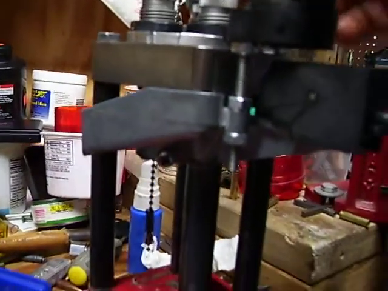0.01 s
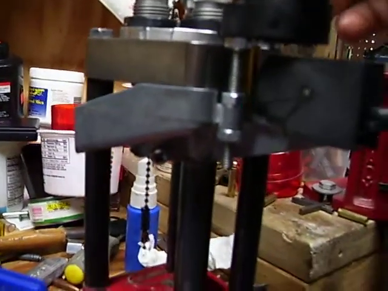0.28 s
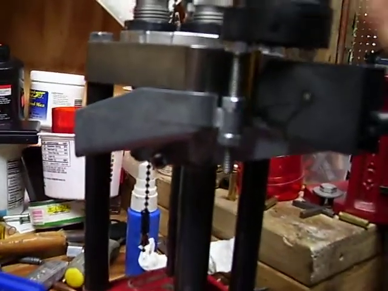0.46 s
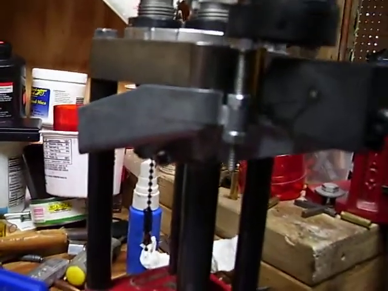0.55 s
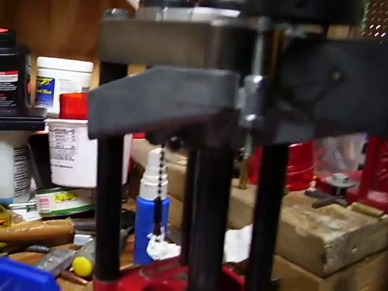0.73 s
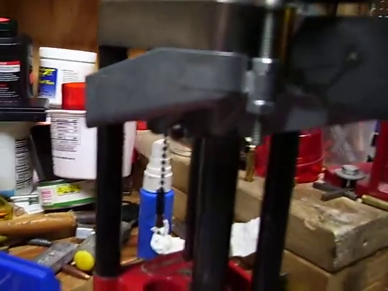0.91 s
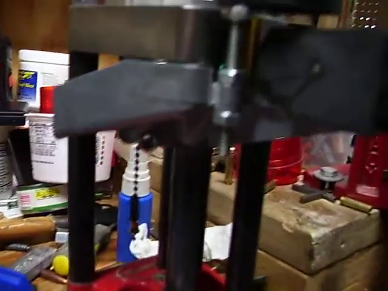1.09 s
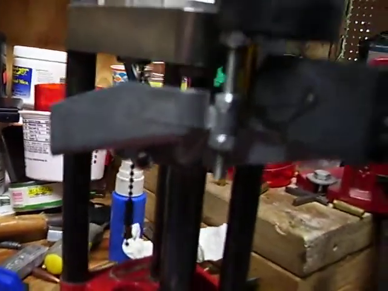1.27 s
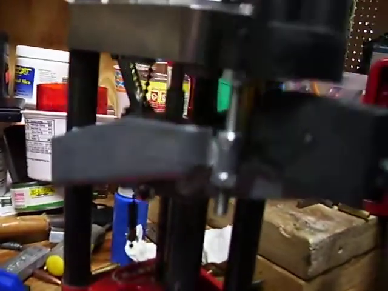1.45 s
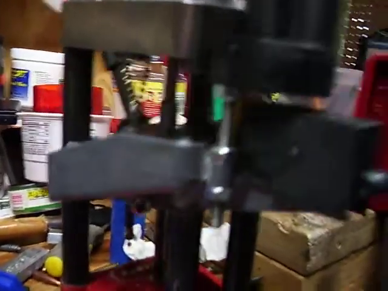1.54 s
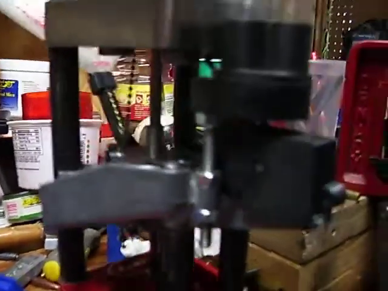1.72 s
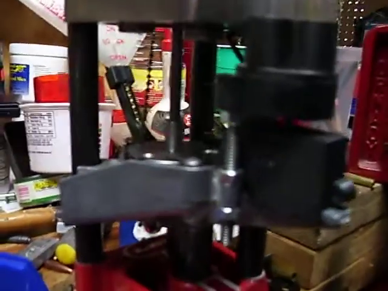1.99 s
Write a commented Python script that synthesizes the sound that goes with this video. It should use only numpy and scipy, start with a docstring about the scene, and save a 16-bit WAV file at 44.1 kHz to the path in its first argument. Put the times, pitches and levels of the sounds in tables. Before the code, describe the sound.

Close by in a small workshop, a metal lever press is worked by hand: small parts rattle and snap, the linkage knocks with a faint groan, and the sliding ram scrapes and clunks twice, the second time harder.

```python
"""A small workshop, close to a hand-worked metal reloading press on a wooden bench.
Small parts rattle and snap against the plate, the linkage knocks and groans as the lever takes up
its slack, then the ram slides down with a scraping rattle and two clunks of the frame. Impacts and
stick-slip friction excite each part's dense response and its distinct, damped modes.
The microphone passes little above 4 kHz and overloads on the hardest blows."""
import sys
import numpy as np
from scipy import signal
from scipy.fft import rfft, irfft
from scipy.io import wavfile
from scipy.ndimage import uniform_filter1d

SR = 44100
rng = np.random.default_rng(int(sys.argv[2]) if len(sys.argv) > 2 else 0)


def bounce(signal):
    """Save signal as a 16-bit WAV file at the path given by the first command-line argument."""
    frames = np.transpose(np.atleast_2d(signal))
    limited = np.clip(frames, -1, 1)
    pcm = np.round(limited * 32767).astype(np.int16)
    wavfile.write(sys.argv[1], SR, pcm)


N = 88200

# Friction envelopes of the ram: time_s, body_db, treble_db, bass_db
RAM_LEVELS = [(0, -44, -59.5, -59), (0.139, -48, -54, -61), (.5, -68, -66.5, -76), (.88, -65.5, -76, -63.5),
              (.93, -52, -75.5, -44.5), (1.02, -57.5, -68, -59), (1.17, -69, -59, -59.5),
              (1.23, -57, -57.5, -46), (1.275, -54, -48, -57), (1.298, -36, -39.5, -62.5),
              (1.352, -35, -45.5, -52), (1.40, -27.5, -23.5, -41.5), (1.47, -30, -24.5, -40.5),
              (1.54, -30.5, -34, -44), (1.589, -27.5, -33, -45), (1.634, -31.5, -40.5, -44.5),
              (1.675, -26, -32.5, -54), (1.72, -33, -42.5, -43), (1.76, -26.5, -24.5, -46),
              (1.82, -40.5, -27, -46), (1.85, -34.5, -33.5, -42.5), (1.89, -28.5, -36, -36),
              (1.928, -40.5, -46, -51), (1.959, -38.5, -37, -60), (2.0, -57, -52, -57)]
# Blows on the plate and snaps of the sprung catch: start_s, level_db
PLATE_BLOWS = [(.002, -37.5), (.106, -26.5), (.123, -26.5), (0.139, -28.5), (0.197, -32), (0.2179, -7.5),
               (.232, -19), (0.2818, -44), (.294, -37)]
CATCH_SNAPS = [(0.2119, -6.5), (0.2144, -7), (0.2164, -11), (0.2201, -12), (0.2238, -10), (0.2272, -18),
               (0.2483, -17.5), (0.262, -23.5), (0.2714, -27), (0.2768, -22.5), (0.2814, -30),
               (.319, -30.5), (0.3808, -34.5)]
# Impacts of small steel parts and of the frame: start_s, level_db, tilt_db_per_octave
STEEL_CLICKS = [(0.1002, -26.5, -4), (.119, -24.5, -5), (0.13, -23, -4), (.179, -47, 0.5),
                (1.071, -31.5, -6), (1.092, -26.5, -8), (1.3586, -23.5, -0.5), (1.3692, -22.5, -3.5),
                (1.380, -22, -0.5), (1.3855, -15, -0.5), (1.390, -14, -3), (1.3979, -16, 3),
                (1.4182, -21, -0.5), (1.4312, -22.5, 6.5), (1.4412, -13.5, 5.5), (1.4609, -22.5, 1.5),
                (1.481, -25.5, -0.5), (1.7278, -35.5, 0.5), (1.7423, -25, -3.5), (1.7458, -19, 5),
                (1.7675, -19, 8), (1.7768, -22, 8), (1.787, -18.5, 4), (1.7925, -24, 2), (1.876, -28, 9),
                (1.955, -38.5, -1.5)]
FRAME_CLUNKS = [(1.364, -22, 0), (1.3845, -14.5, -1.5), (1.3885, -13, -2), (1.746, -7, 5.5),
                (1.7516, -5, 2), (1.757, -16, 1.5), (1.881, -30.5, -11)]
# Taps of a loose part: start_s, level_db, pitch_hz
LOOSE_TAPS = [(0.414, -33, 1441), (0.4385, -32.5, 1148), (0.459, -34.5, 1407), (0.472, -35.5, 1230),
              (0.485, -43, 1280)]
# Groans of the slipping linkage: start_s, length_s, pitch_hz, level_db
LINKAGE_GROANS = [(0.904, 0.059, 552, -36), (1.2, 0.079, 104, -44), (1.26, 0.14, 343.6, -32.5)]
# Knocks of the linkage and their thuds in the base: start_s, level_db, tilt_db_per_octave, thud_db
LINKAGE_KNOCKS = [(0.9226, -33, -3, -40.5), (1.0752, -22.5, -3, -29.5), (1.0969, -19.5, 0, -27),
                  (1.194, -24.5, 6.5, -48.5), (1.2015, -23.5, 3.5, -43.5)]

# Dense responses of the struck parts: frequency_hz, gain_db
PLATE_RESPONSE = [(40, -35.5), (200, -26.5), (480, -18.5), (690, 1), (860, -13.5), (1130, 5), (1350, -11),
                  (1650, -11), (3000, -13.5), (4500, -38.5)]
STEEL_RESPONSE = [(40, -33.5), (200, -18.5), (500, -21.5), (1000, -3.5), (1900, -0.5), (2150, -1.5),
                  (2600, 3.5), (3200, -1.5), (3600, -2), (4300, -7)]
CATCH_RESPONSE = [(100, -29.5), (600, -23.5), (1200, -17), (1900, -7), (2350, -7), (2700, 3), (3100, -1.5),
                  (3400, -3), (3620, 0.5), (3900, -9.5), (4400, -10)]
LOOSE_RESPONSE = [(100, -15.5), (900, -17.5), (1130, 8), (1520, 2.5), (1700, -17.5), (3000, -7.5),
                  (4000, -35.5)]
LINKAGE_RESPONSE = [(40, -35.5), (110, -19.5), (220, -14), (320, -7), (450, -2.5), (680, 4), (1000, -12),
                    (1450, -9), (1850, -23), (4500, -39.5)]
FRAME_RESPONSE = [(40, -27.5), (110, -20), (195, -9), (300, -10.5), (460, -8.5), (630, 2), (740, -0.5),
                  (850, -3.5), (1000, -5.5), (1130, -9.5), (1330, -2), (1600, -21), (4500, -33.5)]
# Dense responses of the parts driven by the ram: frequency_hz, gain_db
FRAME_RUB_RESPONSE = [(60, -28), (200, -14.5), (330, 2), (500, -2.5), (640, 0.5), (800, -1.5), (1000, 1.5),
                      (1350, -5.5), (1700, -11), (2200, -14.5), (4000, -25.5)]
STEEL_RUB_RESPONSE = [(200, -34.5), (1300, -17), (1850, 6.5), (2130, -7.5), (2400, 10.5), (2800, 3),
                      (3150, 5), (3500, 5), (5000, -11)]
BENCH_RESPONSE = [(25, -30.5), (75, -24.5), (112, 8), (155, 0.5), (190, 0), (250, 3), (600, -29.5),
                  (2000, -72)]
# Distinct modes of each part: frequency_hz, level_db, t60_s
PLATE_RESONANCES = [(621, -19, 0.17), (700, -8.5, 0.2), (942, -15, 0.3), (1036, -19.5, 0.37),
                    (1126, -12, 0.084), (1226, -5, 0.26), (1385, 2.5, 0.15), (1472, -16, 0.12)]
STEEL_RESONANCES = [(2308, -0.78, 0.2), (2353, -1.2, 0.44), (2525, -2, 0.12), (2776, 1, .16),
                    (2930, -1, 0.23), (3280, 0.91, 0.1), (3360, -0.9, 0.16), (3394, -2.8, 0.16),
                    (3670, 0, 0.095)]
LINKAGE_RESONANCES = [(548, -5, 0.067), (703.5, 5, 0.084)]
BASE_RESONANCES = [(276, -9.5, .06), (345, 0, 0.11), (446, -10.5, .07)]
FRAME_RESONANCES = [(187.9, -15, 0.25), (438.4, -21.5, 0.3), (627, -9, 0.14), (692.3, -16, 0.27),
                    (835, -13, 0.059), (990, -15, .11), (1216, -16.5, 0.29), (1323, -10, 0.11)]
BENCH_RESONANCES = [(106, -12, 0.19), (191.8, -2.5, 0.4), (345, -0.5, 0.39)]

# Spectrum of the steady room noise: frequency_hz, relative_db
ROOM_NOISE = [(25, 15), (60, 4.5), (110, -8.5), (200, -5), (250, -0.5), (480, 1.5), (800, 0.5), (1300, -3),
              (2100, -7), (3400, -12.5), (4300, -12.5)]
# Reverberation time of the workshop: frequency_hz, t60_s
REVERB_TIMES = [(100, 0.66), (500, 0.16), (1300, 0.28), (3500, 0.18)]
# Responses of the reverberation and the microphone: frequency_hz, gain_db
REVERB_RESPONSE = [(200, -9), (1200, -9.5), (3000, -18)]
MIC_RESPONSE = [(20, -19.5), (60, -10), (100, -3.5), (3550, -2.5), (3800, -7), (4100, -11), (4400, -18.5),
                (4700, -53), (5200, -82.5), (6000, -100)]


def amp(db):
    """Amplitude grows tenfold for every 20 dB."""
    return 10 ** (np.asarray(db) / 20)


def unit(x):
    """Normalisation to an rms of 1."""
    return x / np.sqrt(np.mean(x ** 2) + 1e-20)


def read(points, hz):
    """Interpolation on a log-frequency axis."""
    table_hz, value = np.transpose(points)
    return np.interp(np.log(hz + 1), np.log(table_hz + 1), value)


def add(mix, start_s, sound):
    """Superposition: a delayed sound sums into the mix."""
    part = mix[max(round(start_s * SR), 0):][:len(sound)]
    part += sound[:len(part)]


def colour(x, response, tilt_db=0, size=4096):
    """Minimum-phase filtering by a response, tilted by tilt_db per octave from 500 to 4000 Hz."""
    hz = abs(np.fft.fftfreq(size, 1 / SR))
    octaves = np.log2(np.clip(hz, 500, 4000) / 2000)
    log_gain = np.log(amp(read(response, hz) + tilt_db * octaves))
    impulse = np.fft.ifft(np.exp(np.conj(signal.hilbert(log_gain)))).real
    return signal.fftconvolve(x, impulse[:size // 2])[:len(x)]


def ring(modes, length=SR // 3, linewidth_hz=4.6):
    """Damped free vibration: modes build up over a cycle and die; loose contacts shift their phases."""
    t = np.arange(length) / SR
    steps = rng.standard_normal((len(modes), length)) * np.sqrt(2 * np.pi * linewidth_hz / SR)
    return sum((1 - np.exp(-hz * t)) * amp(db - 60 * t / t60) * np.sin(2 * np.pi * hz * t + drift)
               for (hz, db, t60), drift in zip(modes, np.cumsum(steps, axis=1)))


def blow(response, modes, ring_db, chatter_s, tilt_db=0):
    """Impact excitation: dying contact chatter drives a part's dense response, and its modes ring."""
    t = np.arange(SR // 3) / SR
    fade = amp(-60 * t / chatter_s)
    chatter = rfft(rng.standard_normal(len(t)) * fade)
    force = irfft(chatter / (abs(chatter) + 1e-12)) * fade ** .25  # even in spectrum
    lowpass = signal.butter(6, 4500, fs=SR, output="sos")
    knock = signal.sosfilt(lowpass, colour(force, response, tilt_db))
    knock *= np.sqrt(.004 * SR / np.sum(knock ** 2))  # the energy of 4 ms at rms 1
    return knock + amp(ring_db) * ring(modes)


def slips(per_s, spread_db):
    """Stick-slip friction: a random train of tiny, uneven impulses."""
    size = amp(spread_db * np.minimum(rng.exponential(1, N), 4))
    return size * rng.standard_normal(N) * (rng.random(N) < per_s / SR)


def driven(force, response, modes, ring_db):
    """Forced vibration: a sustained force passes through a part's dense response and its modes."""
    modal = signal.fftconvolve(force, ring(modes, SR // 2))[:N]
    return unit(unit(colour(force, response)) + amp(ring_db) * unit(modal))


def ram():
    """Sliding friction: the ram rubs the frame into ringing, rattles steel parts and shakes the bench."""
    times, *levels = np.transpose(RAM_LEVELS)
    body, treble, bass = (amp(np.interp(np.arange(N) / SR, times, db)) for db in levels)
    frame = driven(slips(per_s=3500, spread_db=1.3), FRAME_RUB_RESPONSE, FRAME_RESONANCES, ring_db=-7)
    steel = driven(slips(per_s=4700, spread_db=3), STEEL_RUB_RESPONSE, STEEL_RESONANCES, ring_db=-9)
    bench = driven(rng.standard_normal(N), BENCH_RESPONSE, BENCH_RESONANCES, ring_db=-4)
    return body * frame + treble * steel + bass * bench


def room_noise():
    """Stationary noise: a steady, band-limited background."""
    noise = colour(rng.standard_normal(N), ROOM_NOISE)
    return amp(-44) * unit(colour(noise, MIC_RESPONSE))


def plate_blows(mix):
    """Plate vibration: each blow rings a set of inharmonic modes."""
    for start_s, db in PLATE_BLOWS:
        add(mix, start_s, amp(db) * blow(PLATE_RESPONSE, PLATE_RESONANCES, ring_db=-4, chatter_s=0.032))


def steel_clicks(mix):
    """Small, stiff bodies resonate high: steel parts collide with bright clicks."""
    for start_s, db, tilt_db in STEEL_CLICKS:
        click = blow(STEEL_RESPONSE, STEEL_RESONANCES, ring_db=-25, chatter_s=0.035, tilt_db=tilt_db)
        add(mix, start_s, amp(db) * click)


def catch_snaps(mix):
    """Elastic rebound: a sprung catch snaps home and bounces in brief contacts."""
    for start_s, db in CATCH_SNAPS:
        snap = blow(CATCH_RESPONSE, STEEL_RESONANCES, ring_db=-26, chatter_s=0.0097)
        add(mix, start_s, amp(db) * snap)


def loose_taps(mix):
    """One dominant mode gives each light tap of a loose part its pitch."""
    for start_s, db, hz in LOOSE_TAPS:
        add(mix, start_s, amp(db) * blow(LOOSE_RESPONSE, [(hz, 0, .04)], ring_db=5, chatter_s=0.066))


def linkage_groans(mix, waver_depth=0.029):
    """Frictional oscillation: wavering tones swell and fade as the loaded linkage starts to slip."""
    t = np.arange(N) / SR
    for start_s, length_s, hz, db in LINKAGE_GROANS:
        waver = unit(uniform_filter1d(rng.standard_normal(N), size=400))
        cycles = np.cumsum(hz * (1 + waver_depth * waver)) / SR
        swell = np.sin(np.pi * np.clip((t - start_s) / length_s, 0, 1))
        mix += amp(db) * swell * np.sin(2 * np.pi * cycles)


def linkage_knocks(mix):
    """Structure-borne sound: the linkage knocks as its slack closes and passes a thud to the base."""
    for start_s, db, tilt_db, thud_db in LINKAGE_KNOCKS:
        thud = ring(BASE_RESONANCES)
        knock = blow(LINKAGE_RESPONSE, LINKAGE_RESONANCES, ring_db=-16, chatter_s=0.054, tilt_db=tilt_db)
        add(mix, start_s, amp(db) * knock + amp(thud_db) * thud)


def frame_clunks(mix):
    """A massive body resonates low: the struck frame clunks."""
    for start_s, db, tilt_db in FRAME_CLUNKS:
        clunk = blow(FRAME_RESPONSE, FRAME_RESONANCES, ring_db=-3.5, chatter_s=0.026, tilt_db=tilt_db)
        add(mix, start_s, amp(db) * clunk)


def reverberation(x, delay_s=0.0019):
    """Diffuse field: the workshop's dense reflections decay exponentially, each band at its own rate."""
    hz, t, spectra = signal.stft(rng.standard_normal(SR // 2), SR, nperseg=256)
    decay = amp(-60 * t / read(REVERB_TIMES, hz)[:, None])
    tail = signal.istft(spectra * decay, SR, nperseg=256)[1]
    tail *= np.clip(np.arange(len(tail)) / SR / delay_s - 1, 0, 1)  # fades in after the delay
    return signal.fftconvolve(x, colour(tail / np.linalg.norm(tail), REVERB_RESPONSE))[:N]


def scene():
    """Superposition of the press's direct sound, its reflections and the room noise."""
    press = ram()
    plate_blows(press)
    steel_clicks(press)
    catch_snaps(press)
    loose_taps(press)
    linkage_groans(press)
    linkage_knocks(press)
    frame_clunks(press)
    mix = press + reverberation(press) + room_noise()
    add(mix, 0.0033, amp(-18.5) * press)  # first reflection, off the bench top
    return mix[None]


def record(dry):
    """Asymmetric clipping: the narrow-band microphone overloads; a low-pass limits the distortion."""
    ceiling, bias, cutoff_hz = 0.73, 0.0097, 16000
    clipped = np.clip(colour(dry[0], MIC_RESPONSE), bias - ceiling, bias + ceiling)
    lowpass = signal.firwin(511, cutoff_hz, window=("kaiser", 9), fs=SR)
    return signal.oaconvolve(clipped, lowpass, "same")[None]


dry = scene()
out = record(dry)
bounce(out)
```